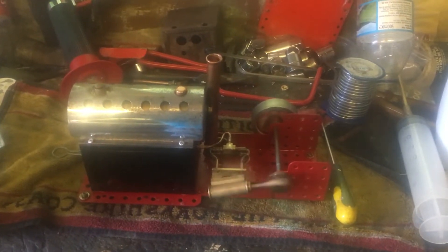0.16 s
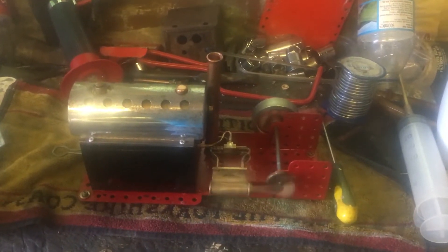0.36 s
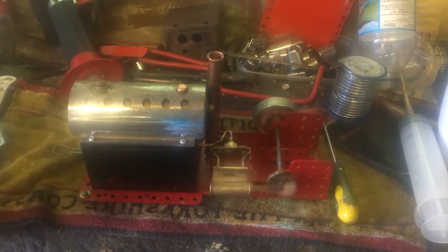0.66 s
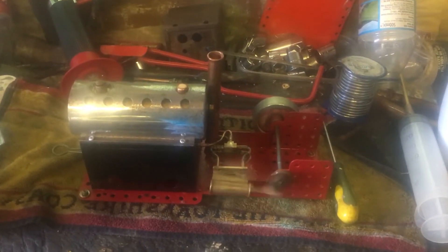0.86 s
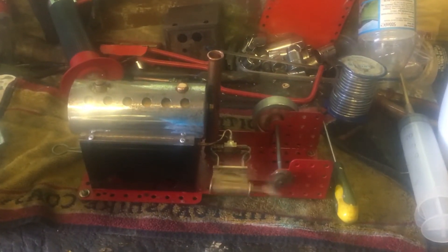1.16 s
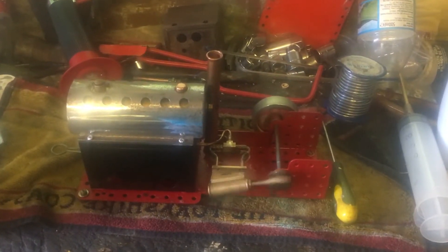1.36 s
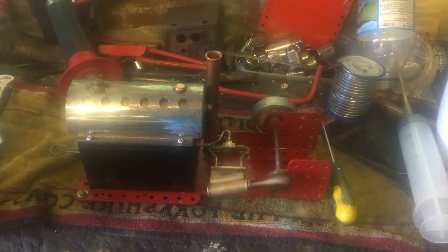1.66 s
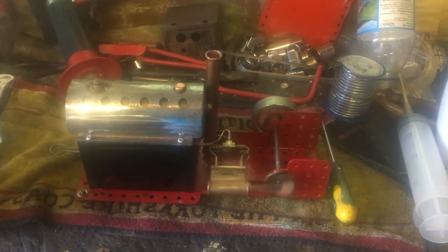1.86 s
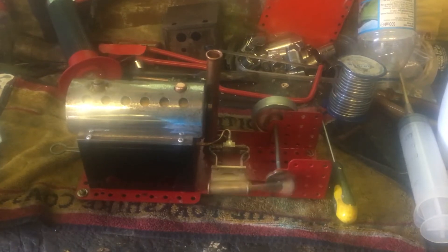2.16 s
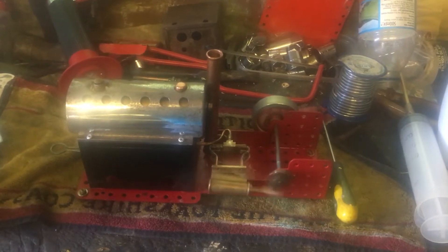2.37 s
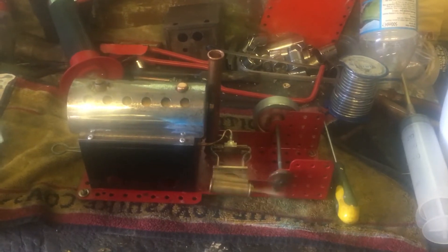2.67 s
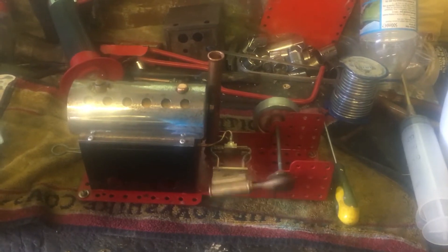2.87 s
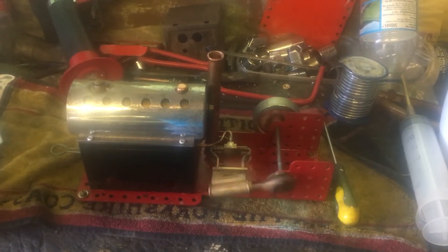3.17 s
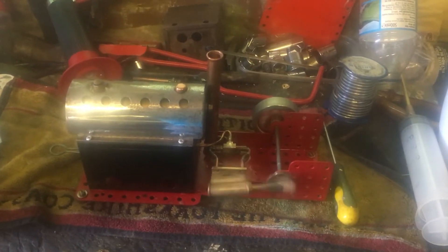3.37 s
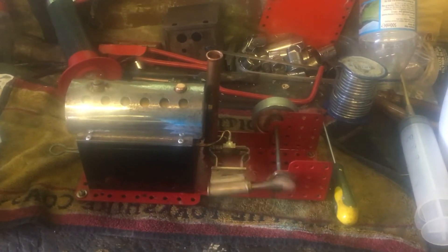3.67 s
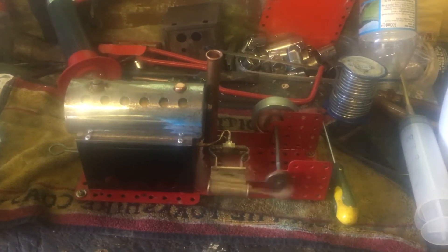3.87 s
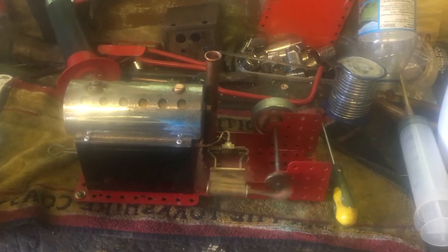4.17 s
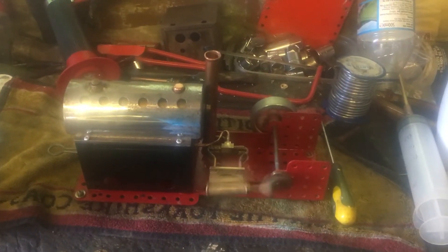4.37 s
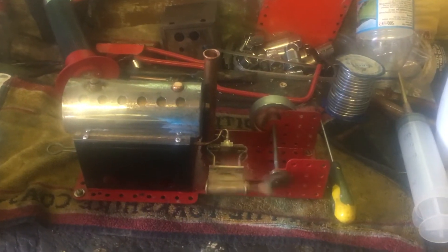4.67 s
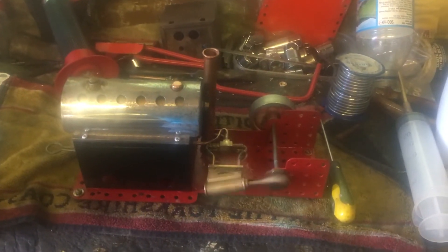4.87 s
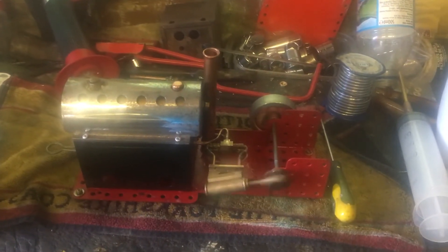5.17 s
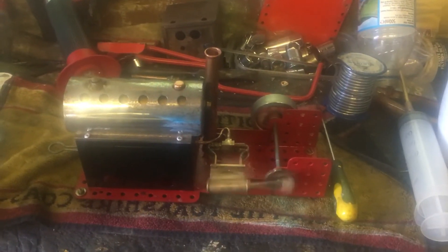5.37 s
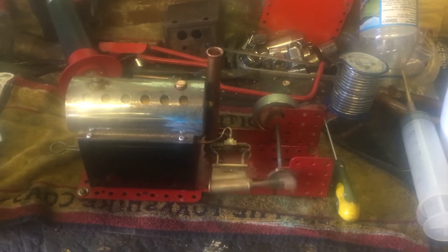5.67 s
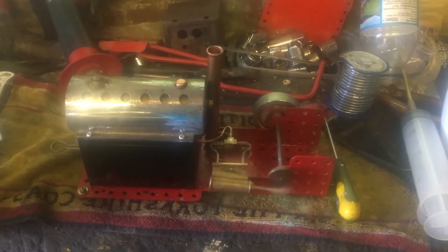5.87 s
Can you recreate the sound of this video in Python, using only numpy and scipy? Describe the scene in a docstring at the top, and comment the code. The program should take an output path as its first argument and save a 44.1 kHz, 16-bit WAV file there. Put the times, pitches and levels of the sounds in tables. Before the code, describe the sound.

Already running and never stopping, a miniature engine gives a rapid, raspy chuff of bright wet steam, two uneven puffs per turn at about thirteen turns a second. Hollow metallic chimney tones colour the hiss. Random droplets crackle and knock, with an occasional harder tick. The close mono microphone catches a short, dry room response and quiet low rumble.

```python
"""A small model steam engine runs at about 13 turns a second on a workbench, close to a mono microphone.
Twice a turn its rocking cylinder uncovers a port: a puff of wet steam hisses out, as sputtering noise
through resonances of nozzle, brass, base plate and chimney. Water drops spit as pushes and sprays of noise
and the rod ticks as short noise bursts. Pushes of the crank thump the bench, the boiler simmers on one note,
and the room adds a short diffuse answer, a low rumble and a faint mains hum."""
import sys
import numpy as np
from scipy import signal
from scipy.fft import rfft, irfft, next_fast_len
from scipy.io import wavfile
from scipy.ndimage import uniform_filter1d, map_coordinates

SR = 44100
rng = np.random.default_rng(int(sys.argv[2]) if len(sys.argv) > 2 else 0)


def bounce(signal):
    """Save signal as a 16-bit WAV file at the path given by the first command-line argument."""
    frames = np.transpose(np.atleast_2d(signal))
    limited = np.clip(frames, -1, 1)
    pcm = np.round(limited * 32767).astype(np.int16)
    wavfile.write(sys.argv[1], SR, pcm)


N = 265482

# resonances of the port where the jet leaves: f/Hz, width/Hz, relative level/dB
NOZZLE_MODES = [(9400, 470, -2.5), (9900, 430, -4), (10500, 250, -12), (10790, 160, -4), (11365, 260, 2),
                (11900, 350, -4.5), (12300, 270, -7), (12950, 130, 0.5), (13300, 350, -4), (13600, 370, 1),
                (14400, 200, -8), (14750, 300, -7.5), (15000, 350, -4.5), (15730, 280, -1.5)]
# resonances of the frame: f/Hz, width/Hz, relative level/dB
FRAME_MODES = [(5260, 52, -2), (5300, 60, -10), (5535, 113, 2.5), (6030, 336, -0.5), (6730, 163, -2),
               (7210, 135, -1), (7780, 410, -1.5), (8920, 175, -2)]
# resonances of the valve block: f/Hz, width/Hz, relative level/dB
BLOCK_MODES = [(3153, 85, -2.5), (3462, 141, 5), (3569, 353, 1.5)]
# resonances of the cylinder: f/Hz, width/Hz, relative level/dB
CYLINDER_MODES = [(4097, 240, -2.5), (4340, 240, -2), (4634, 166, -0.5)]
# resonances of the base plate: f/Hz, width/Hz, relative level/dB
PLATE_MODES = [(511, 38, -8), (574.5, 18, 0), (682, 140, -6), (790, 75, -5), (1333, 74, 1), (1470, 66, 1),
               (1582, 90, 0), (1923, 180, -5), (2350, 460, -12)]


def steam():
    """Each puff hisses through the port and blows the brass, the plate and the chimney; a small leak never stops."""
    # drier steam makes a brighter jet: t/s, jet level/dB
    dryness = [(0, -0.5), (1.5, -1.7), (2.2, -1), (4, -0.5), (6.02, -2.1)]
    jet_db, block_db, chimney_db, cylinder_db = strokes()
    frame_db = 0.74 * jet_db + 0.31 * block_db  # the frame takes after both jet and block
    plate_db = 0.57 * cylinder_db + 0.4 * chimney_db  # the plate carries cylinder and chimney
    bright_db = np.interp(np.arange(N) / SR, *np.transpose(dryness))
    sputter_db = 1.37 * wobble(150)  # shared by all parts

    jet_noise = patches(wet_noise(lumps_db=1.0, rate=300, drops_db=2.1), depth_db=0.5)
    jet = amp(jet_db + bright_db - 1.5 + sputter_db) * jet_noise
    frame_noise = patches(wet_noise(lumps_db=1.2, rate=400, drops_db=1.5), depth_db=2.08)
    frame = amp(frame_db - 2.0 + 0.73 * sputter_db) * frame_noise
    block_noise = wet_noise(lumps_db=-0.66, rate=200, drops_db=2.5)
    block = amp(block_db + 2.0 + 1.3 * sputter_db) * block_noise
    cylinder_noise = wet_noise(lumps_db=2.5, rate=330, drops_db=3.5)
    cylinder = amp(cylinder_db - 2.46 + 0.79 * sputter_db) * cylinder_noise
    plate_noise = wet_noise(lumps_db=0.3, rate=370, drops_db=1.5)
    plate = amp(plate_db - 2.0 + 1.8 * sputter_db) * plate_noise
    chimney_noise = wet_noise(lumps_db=-0.5, rate=73, drops_db=1.44)
    chimney = amp(chimney_db - 0.5 + 0.41 * sputter_db) * chimney_noise

    leak = amp(-54.5) * rng.standard_normal(N)
    jet_and_frame = blown(jet + leak, NOZZLE_MODES) + ring(frame + 0.8 * leak, FRAME_MODES)
    hiss = above(jet_and_frame, edge_hz=4400, damping=1.207)
    brass = ring(block, BLOCK_MODES) + ring(cylinder, CYLINDER_MODES)
    return hiss + brass + ring(plate, PLATE_MODES) + flue(chimney)


def strokes():
    """Each puff swells and dies over its stroke; gives jet, valve block, chimney and cylinder in dB per sample."""
    # course of a puff around its usual level: share of the stroke,
    # jet level/dB, valve block level/dB, chimney level/dB, cylinder level/dB
    short_stroke = [(0, -8, -19, -5, -17), (.07, -2, -0.5, 1.5, -2.5), (.18, 1, 0.5, 1, -4),
                    (.29, 0, 0.5, 0, 4.5), (.45, -0.5, 0, 1.5, -2), (.58, -4, -3.5, 3, -9.5),
                    (.7, -2.5, -10.5, 4, -28), (.79, -21, -1.5, -27, -29), (.9, -5.5, -9.5, -8.5, -17),
                    (1, -5.5, -12, -10, 5)]
    long_stroke = [(0, -6.5, 5, 9, 8), (.06, 1, 1, -4, 7), (.2, 0, -1, -0.5, -2), (.35, 0.5, 0, 2, -6),
                   (.55, -0.5, -2.5, -1, -0.5), (.7, -4, -7, -2.5, -30), (.85, -8.5, -13.5, -19, -15),
                   (.95, -31, -12.5, -27.5, -46), (1, -2, 12, 11, -30)]
    # share of a puff's extra strength and fade felt in brass and chimney
    brass_follows, chimney_follows = 0.42, 0.77

    opens, usual, extra_db, fade_db, block_db, chimney_db = puffs()
    position = np.interp(np.arange(N) / SR, opens, np.arange(len(opens)))
    puff = position.astype(int)
    share = position - puff

    def course(rows):
        shares, *levels = np.transpose(rows)
        return np.array([np.interp(share, shares, level) for level in levels])

    shape = np.where(puff % 2, course(long_stroke), course(short_stroke))
    late = np.clip(1.4 * (share - .2), -.5, 1)  # pressure falls faster in some strokes
    flow_db = extra_db[puff] + fade_db[puff] * late
    jet = usual[0, puff] + usual[1, puff] * late + flow_db
    brass = (usual[2] + block_db)[puff] + brass_follows * flow_db
    chimney = (usual[3] + chimney_db)[puff] + chimney_follows * flow_db
    levels_db = shape + np.array([jet, brass, chimney, brass])
    return uniform_filter1d(levels_db, size=40, axis=1)


def puffs():
    """No two puffs are alike: per puff, opening time and jet, fade, valve block and chimney in dB."""
    # usual short and long puff: jet level/dB, fade of the jet/dB, valve block level/dB, chimney level/dB,
    # scatter of the opening/s
    usual_puffs = [(-28, -5, -39.5, -41.5, .0007), (-30.5, 0.5, -40.5, -40, 0.0015)]
    # scatter from puff to puff: jet/dB, fade/dB, valve block/dB, chimney/dB
    spread_db = (0.98, 2.9, 0.88, 1.3)
    # puffs that stand out: port opens t/s, strength over the usual/dB, fade over the usual/dB
    odd_puffs = [(0.126, 4, -8), (0.202, -1, -9), (0.353, 2, -9), (0.427, 2.5, 0), (0.501, 4, -10),
                 (0.61, -2.5, -3), (0.802, 3, -4), (0.951, -1.5, 3), (1.024, -5, 5), (1.058, 1.5, -13),
                 (1.101, -4, 2), (1.282, 0.5, 5.5), (1.326, -4.5, 0), (1.402, 3, -3), (1.435, -2.5, -6),
                 (1.626, -1, -3), (1.703, 2, -10), (1.853, 3, -2), (1.884, -3, 1), (1.927, 3, -5),
                 (2.002, -4, 5), (2.034, -0.8, -8), (2.15, -0.5, 11), (2.778, -2, 7), (3.009, 3, -6),
                 (3.081, -1, 10), (3.27, -1, -2), (3.303, -1, -1), (3.344, 3, -7), (3.451, 2, 2.5),
                 (3.526, 0.2, -7), (3.57, -4.5, -4), (3.789, 0.5, 3), (3.896, 3, 4), (3.937, -2, 9),
                 (4.012, -2, -3), (4.044, -2.5, 8), (4.162, 3, -5), (4.236, -1.7, 5), (4.312, -0.2, -9),
                 (4.419, -0.5, 6), (4.61, 2.2, 0), (5.089, 3, -10), (5.238, 2.3, -12), (5.426, 3, 3),
                 (5.573, -6, -8), (5.608, -3.5, -13), (5.648, 1.5, 0), (5.794, -0.8, 7), (5.828, -1.5, 4)]
    # boiler pressure, added to every puff: t/s, level/dB
    pressure = [(0, -1.5), (1, 0.5), (2, 0.5), (2.6, 0), (3.4, .5), (3.7, -0.5), (5, 0.86), (5.6, 1),
                (6.02, 1.5)]

    even = port_times()
    usual = np.array(usual_puffs)[np.arange(len(even)) % 2].T
    chance = rng.standard_normal((len(even), 5)).T
    opens = even + usual[4] * chance[4]
    extra_db, fade_db, block_db, chimney_db = np.array(spread_db)[:, None] * chance[:4]
    s, odd_db, odd_fade_db = np.transpose(odd_puffs)
    odd = np.abs(even[:, None] - s).argmin(axis=0)  # the nearest puff
    opens[odd], extra_db[odd], fade_db[odd] = s, odd_db, odd_fade_db
    extra_db = extra_db + np.interp(opens, *np.transpose(pressure))
    return opens, usual[:4], extra_db, fade_db, block_db, chimney_db


def port_times():
    """When the evenly turning crank uncovers a port: short and long puff in turn."""
    # flywheel: t/s, speed/turns per second
    speed = [(0, 13.372), (1.5, 13.301), (3.01, 13.454), (4.51, 13.425), (6.02, 13.537)]
    start_turn = 0.308  # share of the turn done at 0 s
    long_opens = 0.438  # share of the turn where the long puff starts
    t = np.arange(-SR // 10, N + SR // 10) / SR  # a margin of 0.1 s at both ends
    turns = np.cumsum(np.interp(t, *np.transpose(speed))) / SR
    turns = turns - np.interp(0, t, turns) + start_turn
    marks = (np.arange(int(turns[-1]) + 1)[:, None] + [0, long_opens]).ravel()
    return np.interp(marks[marks < turns[-1]], turns, t)


def flue(x):
    """The chimney rings in a few resonances and radiates little below its edge."""
    # resonances of the chimney: f/Hz, width/Hz, relative level/dB
    chimney_modes = [(989, 73, -5.5), (1139, 99, 9), (1255, 93, -0.5)]
    return above(ring(x, chimney_modes), edge_hz=857, damping=0.9)


def spits():
    """A drop bursts: one push rings chimney and plate, and a short spray cracks at the port."""
    # big water drops: t/s, push level before the ringing/dB, crack level relative to the push/dB
    big_drops = [(0.186, -13, -3), (0.29, -14, -17), (0.332, -15, -8), (0.429, -16.5, 1),
                 (0.462, -14.5, -2), (0.49, -13, -9), (0.552, -16.5, -15), (0.911, -9.5, -7),
                 (0.986, -14, -12), (1.065, -14, -4), (1.179, -16, -18), (1.494, -17, -17),
                 (1.709, -21.5, 6.5), (1.789, -16, -19), (1.859, -17, -1), (2.415, -16, -2.5),
                 (2.637, -13, -15), (2.675, -16, -8), (2.709, -15.5, -7), (2.862, -21, 8),
                 (2.903, -15.5, -6.5), (3.009, -15.5, 3.5), (3.087, -15, -12), (3.124, -16, -6),
                 (3.231, -15, -15), (3.539, -18, 0), (3.676, -15, 0), (3.753, -15.5, -4), (3.87, -9, -5.5),
                 (4.199, -21, -4), (4.254, -16.5, 2), (4.318, -13.5, -19), (4.624, -14, -1),
                 (4.765, -14, -4), (4.853, -14, -18), (4.92, -15.5, -12), (5.013, -14.5, -11),
                 (5.066, -16, 0.5), (5.246, -17, -11), (5.291, -13, -14), (5.323, -16, -11),
                 (5.397, -14, -0.5), (5.518, -14.5, -11), (5.581, -17, -1), (5.798, -13, -5),
                 (5.881, -11, -13), (5.989, -11.5, -18)]
    s, db, crack_db = np.vstack([big_drops, small_drops()]).T
    push = blows(s, amp(db))
    decay = amp(-60 * np.arange(800) / SR / 0.0043)  # 60 dB down in 4.3 ms
    spray = signal.fftconvolve(blows(s, amp(db + crack_db)), decay)[:N] * rng.standard_normal(N)
    knock = amp(7) * flue(push) + amp(1) * ring(push, PLATE_MODES)
    crack = ring(spray, NOZZLE_MODES) + 0.83 * ring(spray, FRAME_MODES) + 0.87 * ring(spray, BLOCK_MODES)
    return knock + amp(-4.0) * crack


def small_drops():
    """Most port openings send off a small drop, which spits after a random delay; rows are laid out like the
    big drops."""
    # small drops: chance of a drop per port opening,
    # two bounds of the random time offset from a port opening, before or after/s,
    # push level before the ringing/dB, crack level relative to the push/dB, scatter of both/dB
    drop_settings = (0.75, 0.74, -0.07, -23, -10, 4)
    share, bound_a, bound_b, db, crack_db, scatter_db = drop_settings
    opens = port_times()
    pick = rng.random(len(opens))
    chance = rng.standard_normal((len(opens), 2))
    s = opens + bound_a + (bound_b - bound_a) * pick / share
    rows = np.column_stack([s, [db, crack_db] + scatter_db * chance])
    return rows[(pick < share) & (opens > 0) & (s < N / SR)]


def ticks():
    """Late in each short stroke the piston rod crosses its play and ticks on the brass, now and then harder."""
    # harder contacts of the rod: t/s, burst level before the ringing/dB
    hard_ticks = [(0.976, -27), (1.051, -29), (1.1974, -26), (2.4942, -14), (2.579, -23), (2.6745, -24),
                  (3.452, -15.5), (3.551, -23), (5.5194, -31)]
    opens = port_times()
    long_opens = opens[1:-1:2]
    short_opens = opens[:2 * len(long_opens):2]
    chance = rng.standard_normal((len(long_opens), 2))
    at = short_opens + (.79 + 0.028 * chance[:, 0]) * (long_opens - short_opens)
    usual = blows(at, amp(-29 + 2 * chance[:, 1]) * (at < N / SR))
    s, db = np.transpose(hard_ticks)
    contacts = usual + blows(s, amp(db))
    decay = amp(-60 * np.arange(600) / SR / 0.0031)  # 60 dB down in 3.1 ms
    tick = signal.fftconvolve(contacts, decay)[:N] * rng.standard_normal(N)
    brass = ring(tick, FRAME_MODES) + 0.36 * ring(tick, CYLINDER_MODES)
    return brass + 0.27 * ring(tick, NOZZLE_MODES) + 0.67 * ring(tick, PLATE_MODES)


def crank():
    """The flywheel keeps the turns even; each turn knocks the bench at nearly the same angles."""
    # resonances of the bench: f/Hz, width/Hz, relative level/dB
    bench_modes = [(52.4, 6.5, 4.5), (65.4, 7.7, -2), (148.5, 6, 0), (192, 11, -7), (213.4, 6.7, -1.5),
                   (280.3, 7.3, -1.5), (373.4, 3.8, -17), (578.3, 24, 0)]
    # crank slack taken up: share of the turn after the long puff, relative level/dB
    thumps = [(0.151, -8), (0.561, 4.5), (.95, 9)]
    even = port_times()[1::2]
    period = np.gradient(even)
    push = 0
    for share, db in thumps:
        chance = rng.standard_normal((len(even), 2))
        at = even + share * period + .0001 * chance[:, 0]
        push = push + blows(at, amp(db + 0.27 * chance[:, 1]) * (at < N / SR))
    return amp(-50.5) * unit(ring(push, bench_modes))


def simmer():
    """The simmering boiler keeps one note of the plate humming: noise through one narrow resonance."""
    note_hz, width_hz = 578.7, 13
    return amp(-54.5) * unit(ring(rng.standard_normal(N), [(note_hz, width_hz, 0)]))


def walls(x):
    """A short diffuse answer of bench clutter and walls: decaying noise as impulse response."""
    t = np.arange(SR // 4) / SR
    tail = rng.standard_normal(len(t)) * amp(-60 * t / 0.13) * (t > .003)  # 60 dB down in 0.13 s
    return signal.fftconvolve(x, tail / np.linalg.norm(tail))[:N]


def room():
    """Low rumble of the room, as shaped noise, and mains hum, as a sine."""
    # spectrum of the rumble: f/Hz, relative level per Hz/dB
    rumble_spectrum = [(20, -44), (27, -22), (33, -16), (45, -1), (70, -12), (120, -14), (250, -16),
                       (400, -18), (580, -23.5), (900, -15), (2500, -21), (16000, -27.5)]
    hz, db = np.transpose(rumble_spectrum)

    def response(f):
        return amp(np.interp(np.log(f + 1), np.log(hz), db, left=-120))

    rumble = filtered(rng.standard_normal(N), response)
    hum = amp(-60) * np.sin(2 * np.pi * 100.2 * np.arange(N) / SR)
    return amp(-47) * unit(rumble) + hum


def wet_noise(lumps_db, rate, drops_db):
    """Steam noise of rms 1: the flow sputters, and droplets put spikes into it."""
    spikes = amp(drops_db * rng.exponential(size=N))
    return unit(rng.standard_normal(N) * spikes * amp(lumps_db * wobble(rate)))


def patches(x, depth_db):
    """The jet's colour shifts: random gain in patches of several hundred Hz and some 20 ms."""
    z = signal.stft(x, nperseg=256)[2]
    field = uniform_filter1d(rng.standard_normal(z.shape), size=5, axis=0)
    field = uniform_filter1d(field, size=6, axis=1)
    return signal.istft(z * amp(depth_db * unit(field)), nperseg=256)[1][:N]


def blows(seconds, sizes):
    """Single-sample pushes."""
    at = np.clip(np.round(np.asarray(seconds) * SR).astype(int), 0, N - 1)
    return np.bincount(at, sizes, N)


def ring(x, modes):
    """x through a set of resonances of alternating sign, whose mean power gain is 1."""
    def response(f):
        h = 0
        for k, (c, w, db) in enumerate(modes):
            h = h + (-1) ** k * amp(db) * 1j * f * w / (c * c - f * f + 1j * f * w)
        return unit(np.abs(h)) * np.exp(1j * np.angle(h))
    return filtered(x, response)


def blown(x, modes):
    """Noise through overlapping resonances that ring independently: their powers add."""
    def response(f):
        power = 0
        for c, w, db in modes:
            detuning = (c * c - f * f) / (f * w + 1)
            power = power + amp(2 * db) / (1 + detuning ** 2) ** 1.5
        return unit(np.sqrt(power))
    return filtered(x, response)


def above(x, edge_hz, damping):
    """A small radiator gives little sound below its edge: fourth-order high-pass."""
    def response(f):
        second_order = f * f / (f * f - 1j * f * damping * edge_hz - edge_hz ** 2)
        return second_order ** 2
    return filtered(x, response)


def filtered(x, response):
    """x times a complex response of frequency."""
    m = next_fast_len(N + SR // 2)  # padding leaves room for the ringing
    return irfft(rfft(x, m) * response(np.fft.rfftfreq(m, 1 / SR)), m)[:N]


def wobble(rate):
    """A smooth random curve, rate knots a second."""
    return map_coordinates(rng.standard_normal(int(N * rate / SR) + 4), [np.arange(N) * rate / SR])


def amp(db):
    """Level in dB to linear gain."""
    return 10 ** (np.asarray(db) / 20)


def unit(x):
    """x scaled to rms 1."""
    return x / np.sqrt(np.mean(x ** 2) + 1e-20)


def scene():
    """The engine and its answer from the walls, over crank, boiler and room."""
    engine = steam() + spits() + ticks()
    return (engine + amp(-15) * walls(engine) + crank() + simmer() + room())[None]


def record(dry):
    """A very steep low-pass leaves almost nothing above the band limit."""
    top_hz = 15770
    return filtered(dry[0], lambda hz: 1 / (1 + (hz / top_hz) ** 400))[None]


dry = scene()
out = record(dry)
bounce(out)
```